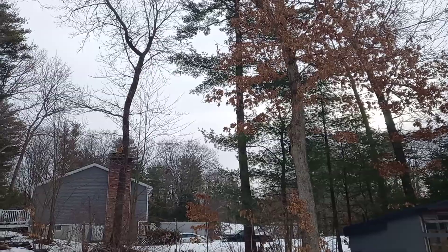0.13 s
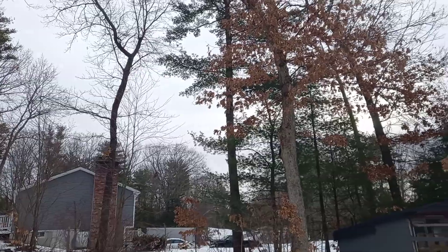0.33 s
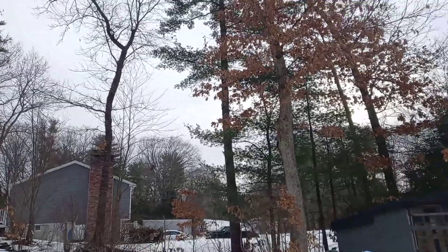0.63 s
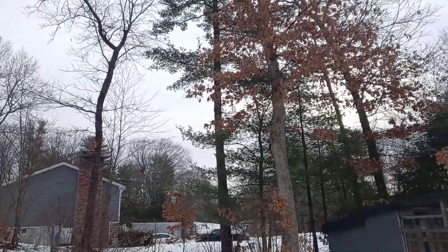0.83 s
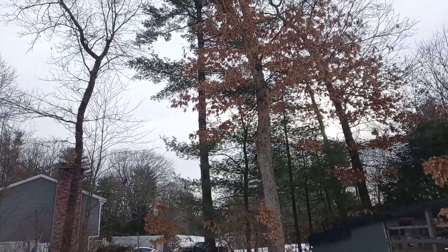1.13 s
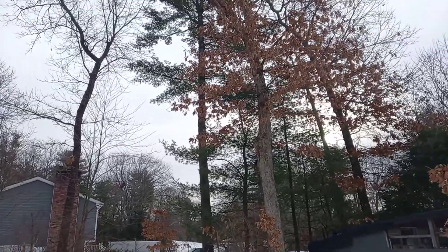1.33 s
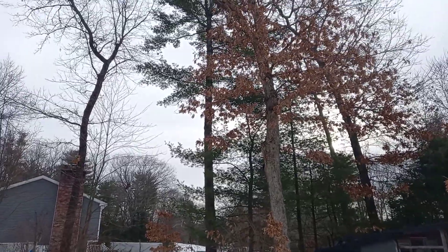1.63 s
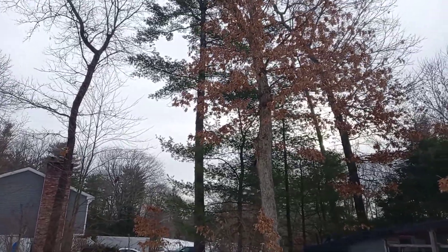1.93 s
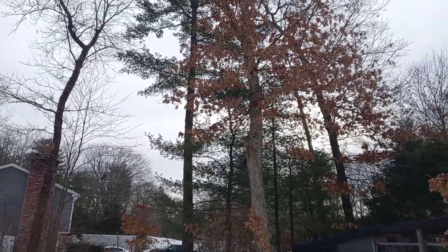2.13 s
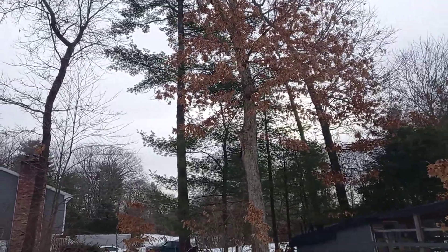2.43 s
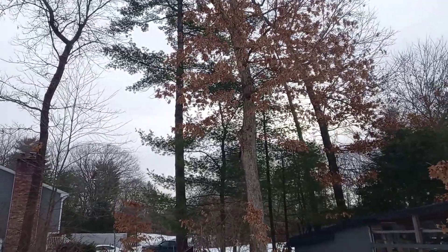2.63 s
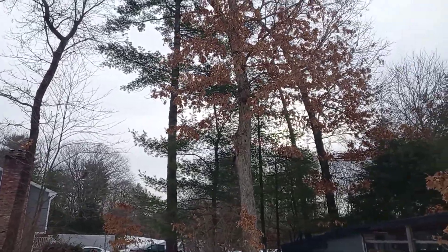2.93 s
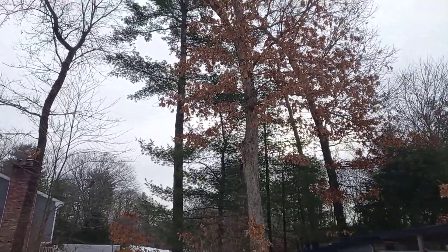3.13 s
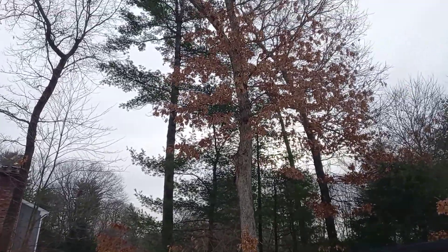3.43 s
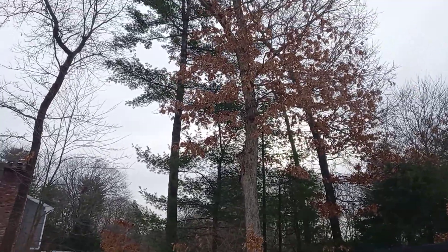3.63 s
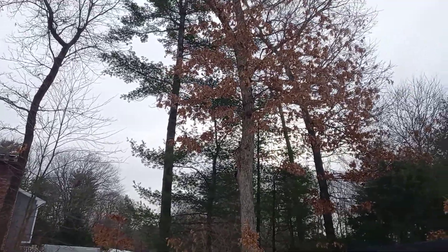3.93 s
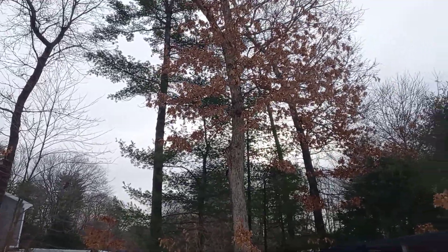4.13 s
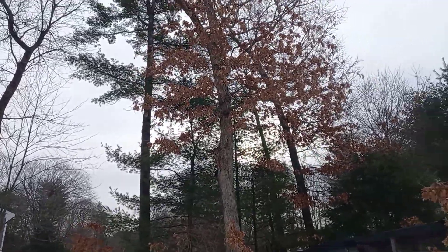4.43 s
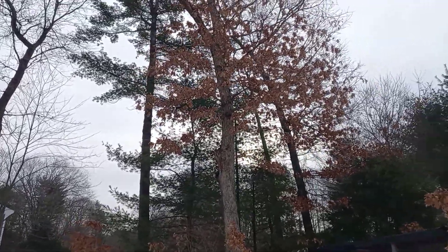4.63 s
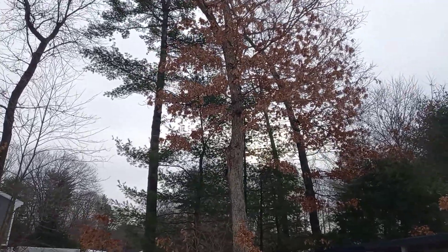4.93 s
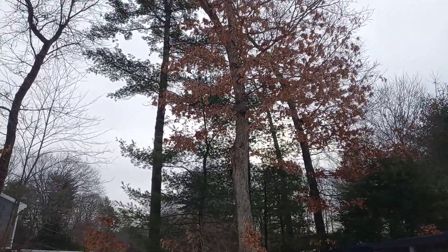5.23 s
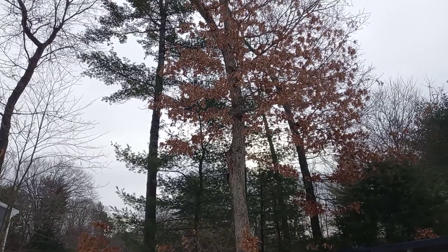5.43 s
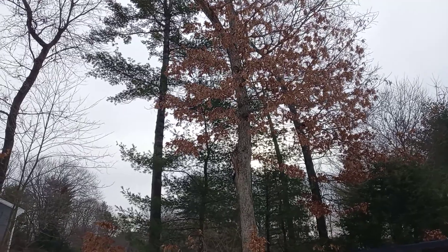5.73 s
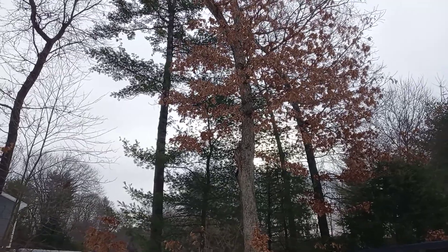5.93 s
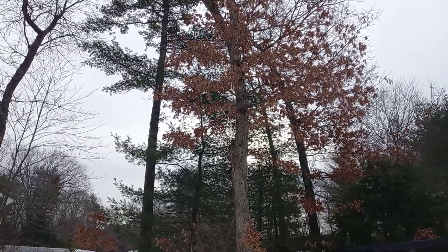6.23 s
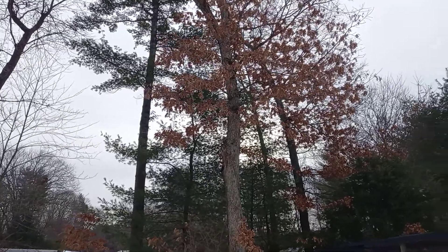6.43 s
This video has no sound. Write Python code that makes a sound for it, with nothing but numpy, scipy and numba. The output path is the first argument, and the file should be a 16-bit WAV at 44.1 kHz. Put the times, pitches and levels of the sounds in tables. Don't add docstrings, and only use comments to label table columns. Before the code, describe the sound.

In a wooded yard beside a house, distant songbirds twitter and whistle over low, hollow wind moaning at the microphone. A close woodpecker gives four hard knocks around three seconds, pauses, then taps softly from the right and finally raps a long, loud, steady series from the left. Each blow cracks and scatters briefly among the trees. Nearer birds whistle upward at the end.

```python
import sys
import numpy as np
from scipy import signal
from scipy.fft import rfft, irfft, next_fast_len
from scipy.io import wavfile
from numba import njit

SR = 44100
rng = np.random.default_rng(int(sys.argv[2]) if len(sys.argv) > 2 else 0)


def generate_wav(sig):
    pcm = np.round(np.clip(np.atleast_2d(sig).T, -1, 1) * 32767).astype(np.int16)
    wavfile.write(sys.argv[1], SR, pcm)


def attenuation_scalar(level_db):
    decades = np.asarray(level_db, float) / 20
    return 10 ** decades


N = 290178
T = np.arange(N) / SR

# pitch_hz, level_db per Hz
AIR_COLOUR = [(350, -16.5), (600, -1.5), (779, -10), (1030, -12), (1830, -11), (2500, -19.5), (3250, -19.5),
              (3530, -20.5), (4580, -23), (10600, -28.5), (13200, -23), (15100, -25.5), (16000, -32)]
AIR_DB = -80.5
# time_s, level_db
STILLNESS = [(.1, 0), (.7, 1), (2.5, -1.7), (3.3, 3.5), (3.9, -1), (4.4, 1.6), (6.58, 0)]
# start_s, length_s, level_db
PINE_SWELLS = [
    (4.3, 1.46, -57.5),
    (5.1, 0.6, -60),
]
# pitch_hz, level_db per Hz
PINE_COLOUR = [(380, -52), (480, 5), (590, -3.5), (720, -12), (1000, -30.5), (1500, -42.5)]
# start_s, length_s, level_db
LEAF_STIRS = [
    (.46, 0.089, -85.5),
    (.5, 1.22, -84),
    (.74, 0.14, -90),
    (1.33, 0.11, -81),
    (1.42, 0.52, -89.5),
    (1.58, 0.17, -91),
    (3.27, 0.064, -81),
    (3.59, 0.075, -82.5),
    (4.02, 0.27, -86),
]
# pitch_hz, level_db per Hz
LEAF_COLOUR = [(5000, -4), (6000, -5.5), (6600, 5), (7300, -2.5), (9000, 0), (11000, -9)]
# start_s, length_s, level_db
CHORUS_SWELLS = [
    (.26, 0.57, -77.5),
    (.6, 0.61, -70.5),
    (1.0, 0.55, -70),
    (1.45, 0.49, -73),
    (1.9, 0.41, -78),
    (1.2, 1.55, -78),
    (2.2, 0.81, -86.5),
    (5.9, 0.5, -69.5),
    (6.2, 0.55, -87),
]
# pitch_hz, level_db per Hz
CHORUS_COLOUR = [(1500, -34), (1900, -8), (2400, -10), (2750, -3), (3250, 4.5), (3500, -10), (4100, -18),
                 (4800, -46.5)]

# time_s, level_db
BREEZE = [(.1, -65.5), (.8, -59), (1.4, -60.5), (2.4, -54), (3.2, -58), (3.7, -56.5), (4.7, -55),
          (5.4, -50.5), (6.1, -52), (6.58, -44.5)]
# peak_s, half_width_s, peak_db, cavity_note_hz
GUSTS = [(0.517, 0.032, -50.5, 311), (0.847, 0.025, -52.5, 416), (0.971, 0.07, -37.5, 332),
         (1.161, 0.11, -41.5, 312), (1.31, 0.074, -53.5, 303), (1.6, 0.084, -43.5, 327),
         (1.822, 0.027, -56.5, 345), (2.035, 0.16, -42.5, 319), (2.183, 0.052, -57, 376),
         (2.399, 0.032, -64.5, 331), (2.579, 0.12, -48, 358), (2.708, 0.084, -61.5, 288),
         (2.939, 0.055, -45, 299.5), (3.382, 0.018, -58, 313), (3.497, 0.073, -56.5, 398.5),
         (3.627, 0.063, -51.5, 442), (4.013, 0.15, -52, 385), (4.335, 0.051, -48, 394),
         (4.498, 0.078, -47, 424.6), (4.681, 0.055, -45.5, 412), (4.925, 0.087, -37.5, 343.5),
         (5.079, 0.0082, -38.5, 360), (5.196, 0.017, -48.5, 379), (5.358, 0.11, -47, 403),
         (5.497, 0.017, -49, 452), (5.733, 0.067, -43.5, 345), (5.854, 0.056, -42, 385),
         (6.06, 0.032, -52.5, 450), (6.362, 0.045, -58, 409), (6.519, 0.063, -42.5, 385)]
# pitch_hz, level_db per Hz
RUSH_COLOUR = [(15, -47.5), (30, -36), (98, -21), (151, -46.5), (195, -13.5), (263, -11), (355, -1.5),
               (541, -13), (600, -28.5), (900, -47.5), (1170, -83), (1980, -120)]
# pitch_hz, level_db
HOUSING_TONES = [(104, -74), (208, -70)]
# peak_s, half_width_s, pitch_hz, level_db
BUFFETS = [
    (.13, .03, 77, -70),
    (.39, .04, 54.6, -73),
    (.70, 0.028, 51.3, -63),
    (4.17, 0.04, 61, -69),
]
CALM_HZ, WANDER_HZ = 385, 15.6
RUMBLE_DB, RUMBLE_FOLLOWS, RUSH_DB, RUSH_FOLLOWS = -68, 0.44, -64.5, 0.5
RUSH_PER_BREEZE = 0.38

# start_hz, end_hz, bend (how early the glide settles)
RISE = (2700, 3230, 4.5)
FALL = (2650, 1945, 5.5)
PICKUP = (2740, 2600, .6)
FAR_RISE = (2760, 3260, 3.2)
# start_s, length_s, level_db
FAR_RISES = [
    (1.105, 0.14, -72.5),
    (1.50, 0.12, -70),
    (1.98, 0.14, -70.5),
]
FAR_FALLS = [
    (.925, 0.09, -81),
    (1.335, 0.082, -77),
    (1.815, 0.093, -72.5),
]
FAR_PICKUPS = [
    (.64, 0.066, -97),
    (.70, 0.033, -83),
    (1.05, 0.032, -83),
    (1.092, 0.023, -78),
    (1.455, 0.02, -81),
    (1.98, 0.025, -71),
]
NEAR_RISES = [
    (5.66, 0.18, -66),
    (6.055, 0.13, -62.5),
    (6.45, 0.18, -64),
]
NEAR_PICKUPS = [
    (6.005, 0.041, -80),
    (6.385, 0.038, -74.5),
    (6.44, 0.022, -69),
]
# start_s, length_s, start_hz, end_hz, level_db
NEAR_CHIPS = [
    (5.94, 0.0484, 2380, 1970, -71.5),
    (6.265, 0.039, 2510, 2040, -74.5),
]
FAR_SLURS = [(.72, 0.116, 3030, 3236, -74.5), (.945, 0.04, 3340, 2590, -77), (1.28, 0.026, 3940, 3870, -88),
             (.975, 0.036, 2370, 2190, -81), (1.11, 0.068, 2210, 2260, -88), (1.165, 0.022, 2880, 3160, -78),
             (1.37, 0.045, 2400, 2260, -78), (1.93, 0.047, 2620, 2900, -81), (2.3, 0.013, 1580, 2610, -82.5),
             (2.397, 0.03, 1760, 2000, -75.5), (1.56, 0.023, 2690, 2800, -69.5),
             (1.862, 0.022, 2460, 2120, -76), (2.04, 0.037, 2550, 3070, -68), (2.413, 0.04, 1990, 1690, -85),
             (2.455, 0.029, 1810, 1930, -94), (2.78, 0.045, 1990, 1835, -76)]
CHATTER = [(.106, 0.023, 3800, 4000, -89), (.131, 0.018, 3140, 3400, -80.5), (.212, 0.11, 2600, 4110, -81),
           (.285, .045, 3310, 3310, -82), (.302, 0.018, 3990, 3470, -72), (.312, 0.031, 3660, 4070, -74.5),
           (.372, 0.043, 3310, 3290, -86), (.386, 0.024, 3920, 4040, -83), (.432, 0.052, 3930, 3980, -81),
           (.472, .025, 3330, 3300, -86), (.515, 0.038, 2450, 2290, -88), (.545, 0.049, 3080, 3300, -92),
           (.74, 0.092, 3860, 4000, -84), (.762, 0.016, 3540, 2900, -72.5), (.792, 0.021, 4000, 3330, -74),
           (.872, 0.023, 4270, 4400, -88), (.885, 0.04, 3860, 4010, -81.5),
           (.916, 0.034, 4210, 4540, -79.5), (1.301, 0.026, 3750, 3370, -79),
           (1.342, 0.048, 3850, 4140, -78), (1.388, 0.026, 3960, 4280, -90),
           (1.417, 0.011, 4240, 3620, -88), (3.126, 0.05, 665, 720, -77.5), (5.906, 0.015, 3360, 3090, -67),
           (6.236, 0.031, 3480, 3050, -65.5), (6.237, 0.048, 3900, 4090, -72.5),
           (6.287, 0.021, 4070, 3060, -68)]
CLEAR_SLURS = [
    (.608, 0.15, 2800, 4080, -81.5),
    (.69, 0.074, 3250, 3950, -85),
    (.955, 0.07, 3890, 2970, -77.5),
    (1.585, .145, 3800, 3990, -78.5),
]
SCOLDS = [(1.90, 0.085, 3930, 3410, -85.5), (2.33, 0.058, 4750, 4020, -81.5),
          (2.335, 0.11, 4360, 3500, -85.5), (2.44, .08, 3230, 2950, -87), (2.585, 0.18, 2920, 3150, -86.5),
          (2.7, 0.08, 3450, 3330, -80), (2.73, 0.095, 3580, 4150, -74.5), (2.815, 0.04, 3350, 3550, -70.5),
          (2.83, .05, 3820, 4200, -74.5)]
THIN_CHIRPS = [
    (.55, 0.075, 4400, 6800, -89),
    (4.04, 0.037, 6350, 7500, -87),
    (4.067, 0.053, 7740, 6000, -87),
    (4.478, 0.036, 7240, 6600, -77),
    (4.504, 0.0064, 7440, 5500, -80),
]
WALL_S = .056

# start_s, peak_db, note_hz
SOFT_TAPS = [
    (0.307, -74, 1610),
    (2.097, -80, 1960),
    (2.189, -67, 1680),
    (4.1843, -71, 1610),
]
# start_s, peak_db, hollow_low_db (relative), trunk_note_hz, crack_db
LEFT_TAPS = [(2.6917, -47, -19, 1680, -5.5), (2.8215, -43.5, -12, 1690, -4.5),
             (2.9461, -37, -14.5, 1680, -2.5), (3.2187, -46, -14, 1820, -3.5),
             (4.7911, -38, -14.5, 1700, -12), (4.9204, -35, -15.5, 1950, -5.5),
             (5.0429, -33.5, -14, 2070, 5), (5.1707, -34.5, -11.5, 2030, 3.5),
             (5.3004, -35.5, -9.5, 1890, 4.5), (5.4228, -33, -10, 2080, -2),
             (5.5649, -34.5, -7.5, 2280, -2.5), (5.7168, -30, -12, 2240, 3), (5.872, -36, -13, 2472, -1.5),
             (6.0292, -42.5, -20.5, 2000, 0), (6.1956, -45.5, -16.5, 1990, -1.5)]
RIGHT_TAPS = [
    (4.293, -51.5, -10.5, 2100, -6),
    (4.416, -46, -13.5, 2390, -9),
    (4.54, -49, -10.5, 2260, -6),
    (4.6762, -52.5, -8, 1840, -5),
]
# pitch_hz, level_db (relative to trunk note)
LEFT_KNOTS = [(1420, 0), (960, 0), (1030, 7.5), (1300, -1), (1480, -18), (1150, -1), (850, -1.5), (930, 0),
              (1410, -10), (1090, 2), (1200, -11), (1200, -13), (1050, -2), (900, -17), (900, -12)]
RIGHT_KNOTS = [(1220, -13), (895, -13), (1010, -7), (1030, -1)]
# pitch_hz, level_db per Hz
BARK_COLOUR = [(1760, -15), (3000, -33), (3410, -3), (4850, -0.5), (5290, -2.5), (6380, 2), (7150, 2.5),
               (7910, -2), (9270, -1.5), (14000, -9.5), (15800, -7.5), (15950, -81)]
# pitch_hz, level_db per Hz
TRUNK_COLOUR = [(35, -38), (90, 4.5), (400, -5), (600, 1), (800, -1), (1150, 1.5), (1500, -5.5),
                (2100, -0.5), (3000, -3), (4500, -8.5), (7000, -55.5)]
# pitch_hz, left_minus_right_db
FROM_LEFT = [(700, -1), (1200, -3), (2200, 0), (5000, 4), (7000, 0), (8500, 12), (10500, 14), (15000, 9)]
FROM_RIGHT = [(700, -1), (1200, -6), (2200, -9), (5000, -2), (7000, -4), (10000, -1), (14000, -6)]
# pitch_hz, level_db
EDGE = [(15800, 0), (15950, -60)]
SOFTEN_DB = 1.74
REBOUND_S = 0.012
TAP_LAG_S, WIND_LAG_S = .00054, .00042
START_S = .103


def rms_one(x):
    return x / np.sqrt(np.mean(x ** 2) + 1e-20)


def in_time(rows):
    s, *columns = np.transpose(rows)
    return [np.interp(T, s, c) for c in columns]


def at_hz(points, size):
    hz, value = np.transpose(points)
    grid = np.fft.rfftfreq(2 * next_fast_len(size // 2 + 1), 1 / SR)
    return np.interp(np.log(grid + 1), np.log(hz), value)


def colour(x, db):
    size = 2 * np.shape(db)[-1] - 2
    return irfft(rfft(x, size) * attenuation_scalar(db), size)[..., :x.shape[-1]]


def drift(rate, size=N):
    r = np.exp(-2 * np.pi * rate / SR)
    run_in = SR // 8
    slow = signal.lfilter([1], [1, -2 * r, r * r], rng.standard_normal(size + run_in))
    return rms_one(slow[run_in:])


def pair(source, lag_s, alike):
    shared, left, right = source
    alike = np.clip(alike, 0, 1)
    late = np.roll(shared, round(lag_s * SR))
    return np.sqrt(alike) * np.array([shared, late]) + np.sqrt(1 - alike) * np.array([left, right])


def bursts(swells, points, flutter_db):
    noise = rms_one(colour(rng.standard_normal((2, N)), at_hz(points, N)))
    level = 0
    for s, length, db in swells:
        u = np.clip((T - s) / length, 0, 1)
        level = level + attenuation_scalar(db) * np.sin(np.pi * u ** 0.95) ** 2
    return level * attenuation_scalar(flutter_db * drift(25)) * noise


def yard():
    air = rms_one(colour(rng.standard_normal((3, N)), at_hz(AIR_COLOUR, N)))
    leaves = bursts(LEAF_STIRS, [(4000, -63.0)] + LEAF_COLOUR + [(13000, -37.0)], flutter_db=1.5)
    pines = bursts(PINE_SWELLS, PINE_COLOUR, flutter_db=1.0)
    chorus = attenuation_scalar(-3.0) * bursts(CHORUS_SWELLS, CHORUS_COLOUR, flutter_db=1.6)
    air_db = AIR_DB + 3.0 + 0.13 * drift(2.1) + in_time(STILLNESS)[0]
    return attenuation_scalar(air_db) * pair(air, 0, 0.097) + leaves + chorus + pines


def gusts():
    t = T[::64]
    s, width, db, hz = np.transpose(GUSTS)[..., None]
    bells = attenuation_scalar(db) * np.exp(-((t - s) / width) ** 2)
    calm = attenuation_scalar(in_time(BREEZE)[0][::64])
    total = calm + bells.sum(axis=0)
    note = (calm * CALM_HZ + (bells * hz).sum(axis=0)) / total
    return np.interp(T, t, 20 * np.log10(total)), np.interp(T, t, note) + WANDER_HZ * drift(3.8)


@njit
def resonate(x, hz, width, rate):
    out, r = np.zeros_like(x), np.exp(-np.pi * width / rate)
    for c in range(x.shape[0]):
        for i in range(2, x.shape[1]):
            push = x[c, i] - x[c, i - 2]
            turn = 2 * r * np.cos(2 * np.pi * hz[i] / rate)
            out[c, i] = push + turn * out[c, i - 1] - r * r * out[c, i - 2]
    return out


def wind():
    moan_db, moan_hz = gusts()
    swing = moan_db + 53
    rumble_db = RUMBLE_DB + RUMBLE_FOLLOWS * swing + 1.9 * drift(6.9)
    breeze_push = RUSH_PER_BREEZE * (in_time(BREEZE)[0] + 58)
    rush_db = RUSH_DB + RUSH_FOLLOWS * swing + breeze_push + 2.22 * drift(10.7)
    white = rng.standard_normal((3, 3, N))

    moan = rms_one(resonate(resonate(white[0], moan_hz, 35., SR), moan_hz, 90., SR))
    moan = attenuation_scalar(moan_db - 4.5) * pair(moan, WIND_LAG_S, 0.77)
    rush = rms_one(colour(white[1], at_hz(RUSH_COLOUR, N)))
    rush = attenuation_scalar(rush_db + 7) * pair(rush, WIND_LAG_S, 0.88)
    low = signal.sosfilt(signal.butter(3, [55, 230], "band", fs=SR, output="sos"), white[2])
    rumble = attenuation_scalar(rumble_db - 3.5) * pair(rms_one(low), WIND_LAG_S, 0.49)

    port_time = T - [[0], [WIND_LAG_S]]
    tones = 0
    for hz, db in HOUSING_TONES:
        tones = tones + attenuation_scalar(db + 1.2 * drift(3.6)) * np.sin(2 * np.pi * hz * port_time)
    tones = tones * attenuation_scalar(rumble_db + 66)
    return (moan + rush + rumble + tones) * attenuation_scalar([[-.8], [.8]])


def buffets():
    out = np.zeros(N)
    for s, width, hz, db in BUFFETS:
        out += attenuation_scalar(db) * np.exp(-((T - s) / width) ** 2) * np.sin(2 * np.pi * hz * T)
    return out


def sung(rows, note):
    from_hz, to_hz, bend = note
    return [(s, length, from_hz, to_hz, db, bend) for s, length, db in rows]


def slurred(rows, bend):
    return [(*row, bend) for row in rows]


def whistles(notes, blur, flutter_db):
    out = np.zeros(N)
    waver = 1 + .05 * blur * drift(460)
    flutter = attenuation_scalar(3.5 + flutter_db * drift(40))
    for s, length, from_hz, to_hz, db, bend in notes:
        span = slice(round(s * SR), round((s + length) * SR))
        u = np.clip((T[span] - s) / length, 0, 1)
        glide = (1 - np.exp(-bend * u)) / (1 - np.exp(-bend))
        hz = (from_hz + (to_hz - from_hz) * glide) * waver[span]
        out[span] += attenuation_scalar(db) * np.sin(np.pi * u) ** 0.6 * np.sin(2 * np.pi * np.cumsum(hz) / SR)
    return out * flutter


def woods(x, wall_db, wet_db, t60, pan_db=9.5):
    t = np.arange(SR // 2) / SR
    paths = attenuation_scalar(wet_db) * rng.standard_normal((2, len(t))) * attenuation_scalar(-60 * t / t60) * (1 - np.exp(-t / .012))
    paths[:, 0] = attenuation_scalar([pan_db / 2, -pan_db / 2])
    paths[:, round(WALL_S * SR)] = attenuation_scalar(wall_db)
    return signal.fftconvolve(x[None], paths, axes=1)[:, :N]


def songbirds():
    chatter = whistles(slurred(CHATTER, bend=1.2), blur=0.33, flutter_db=3.5)
    hoarse = whistles(slurred(SCOLDS, bend=0.53), blur=0.8, flutter_db=2.2)

    far = sung(FAR_RISES, FAR_RISE) + sung(FAR_PICKUPS, PICKUP) + slurred(FAR_SLURS, bend=0.83)
    far = whistles(far, blur=0.23, flutter_db=4.0)
    birds = woods(far, wall_db=-26, wet_db=-28.0, t60=0.56)

    falls = whistles(sung(FAR_FALLS, FALL), blur=0.36, flutter_db=4.0)
    birds += woods(falls, wall_db=-8, wet_db=-26.5, t60=0.48)

    near = sung(NEAR_RISES, RISE) + sung(NEAR_PICKUPS, PICKUP) + slurred(NEAR_CHIPS, bend=0.13)
    near = whistles(near, blur=0.069, flutter_db=4.5)
    birds += woods(near, wall_db=-1, wet_db=-28.0, t60=0.58)

    clear = whistles(slurred(CLEAR_SLURS, bend=1.4), blur=0.12, flutter_db=2.0)
    birds += woods(clear, wall_db=-16, wet_db=-26, t60=0.34)

    birds += woods(hoarse, wall_db=-22, wet_db=-20.0, t60=0.17)
    birds += woods(chatter, wall_db=-15, wet_db=-27, t60=0.24)

    thin = whistles(slurred(THIN_CHIRPS, bend=.6), blur=.06, flutter_db=2.5)
    return birds + woods(thin, wall_db=-22, wet_db=-37, t60=0.2)


def knocks():
    out, t = np.zeros((2, N)), np.arange(SR // 20) / SR
    fall = np.exp(-t / 0.0042)
    rebound = attenuation_scalar(-2.0) * np.roll(fall, round(REBOUND_S * SR))
    tail = attenuation_scalar(-8 - 260 * t)
    for s, db, hz in SOFT_TAPS:
        band = [(hz * .4, -30), (hz * .65, -3), (hz, 0), (hz * 1.4, -6), (hz * 2.5, -22),
                (15800, -40), (15950, -90)]
        noise = pair(rng.standard_normal((3, len(t))), TAP_LAG_S, .7)
        tick = rms_one(colour(noise, at_hz(band, len(t))))
        at = round(s * SR)
        out[:, at:at + len(t)] += attenuation_scalar(db) * tick * (fall + rebound + tail)
    return out


def tap(low_db, hz, crack_db, knot_hz, knot_db, shadow, lag_s):
    size = SR // 4
    t = np.arange(size) / SR
    shade = at_hz(shadow, size) * [[.5], [-.5]]
    uneven = 1.8 * drift(160, shade.shape[1])

    def layer(points, alike):
        grains = rng.standard_normal((3, size))
        grains *= attenuation_scalar(1.6 * np.minimum(rng.exponential(1, (3, size)), 5))
        return rms_one(colour(pair(grains, lag_s, alike), at_hz(points, size) + uneven + shade))

    swell_s = 0.0034 * attenuation_scalar(-SOFTEN_DB * crack_db)
    scatter = (1 - np.exp(-t / swell_s)) * (attenuation_scalar(-60 * t / 0.16) + attenuation_scalar(-25.0 - 71.0 * t))
    scatter = scatter * attenuation_scalar(1.1 * drift(70, size))

    crack = attenuation_scalar(crack_db) * (1 - np.exp(-t / 0.00022)) * np.exp(-t / 0.0022)
    echo = attenuation_scalar(-17.5) * np.roll(crack, round(WALL_S * SR) - 60)
    snap = layer([(40, -44), (500, 1.0), (1200, -24.0), (4000, -14.5), (7000, 1.5), (10000, -2.0),
                  (15500, -8.0), (16600, -28), (16900, -87)], 0.25)

    note = layer([(hz * 0.72, -40), (hz * 0.84, -10), (hz, 0), (hz * 1.16, -10), (hz * 1.32, -40)], 0.75)
    hollow = layer([(knot_hz * .75, -40), (knot_hz * .88, -9), (knot_hz, 0),
                    (knot_hz * 1.13, -9), (knot_hz * 1.3, -40)], 0.85)
    ring_fall = attenuation_scalar(-60 * t / 0.16) + attenuation_scalar(-5.0 - 60 * t / 0.29)
    ring_shape = (1 - np.exp(-t / (0.14 * swell_s))) * ring_fall
    ring = attenuation_scalar(low_db - 2.0) * (note + attenuation_scalar(knot_db) * hollow) * ring_shape

    bark = attenuation_scalar(1.0 - 15.4 * t) * layer(BARK_COLOUR, 0.27)
    trunk = attenuation_scalar(low_db + 9.0 + 33 * t) * layer(TRUNK_COLOUR, 0.55)
    fade = np.clip(3 - 3 * t / t[-1], 0, 1)
    body = colour((ring + (bark + trunk) * scatter) * fade, at_hz(EDGE, size))
    return attenuation_scalar(8.0) * snap * (crack + echo) + body


def woodpecker():
    out = np.zeros((2, N + SR))
    sides = [(LEFT_TAPS, LEFT_KNOTS, FROM_LEFT, TAP_LAG_S),
             (RIGHT_TAPS, RIGHT_KNOTS, FROM_RIGHT, -TAP_LAG_S / 3)]
    for blows, knots, shadow, lag_s in sides:
        for (s, db, *blow), knot in zip(blows, knots):
            one = tap(*blow, *knot, shadow, lag_s)
            at = round(s * SR)
            out[:, at:at + one.shape[1]] += attenuation_scalar(db - 8.0) * one
    return out[:, :N] + knocks()


def scene():
    birds = songbirds()
    tapping = woodpecker()
    surroundings = birds + wind() + buffets() + yard()
    return tapping + colour(surroundings, at_hz(EDGE, N))


def low_pass(x):
    return signal.sosfilt(signal.butter(12, 16850, fs=SR, output="sos"), x)


def record(dry):
    opening = np.clip((T - START_S) / 0.0082, 0, 1)
    closing = np.clip((T[-1] - T) / 0.0011, 0, 1)
    return low_pass(dry * opening * closing)


dry = scene()
out = record(dry)
generate_wav(out)
```